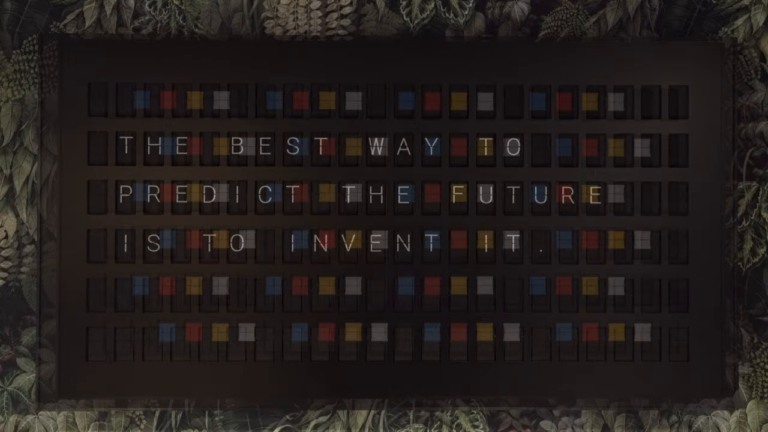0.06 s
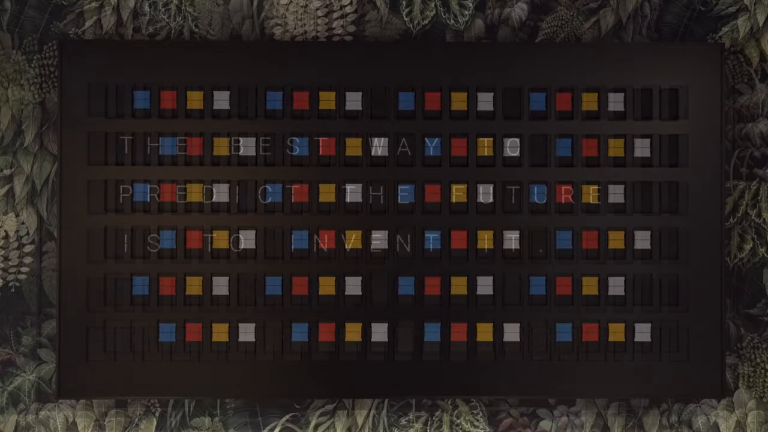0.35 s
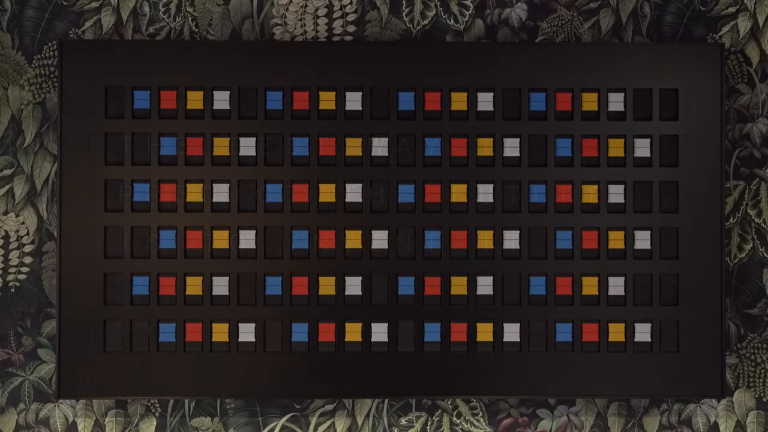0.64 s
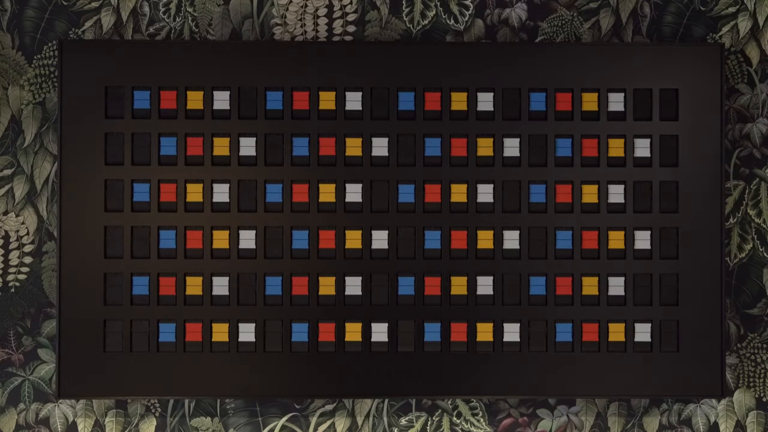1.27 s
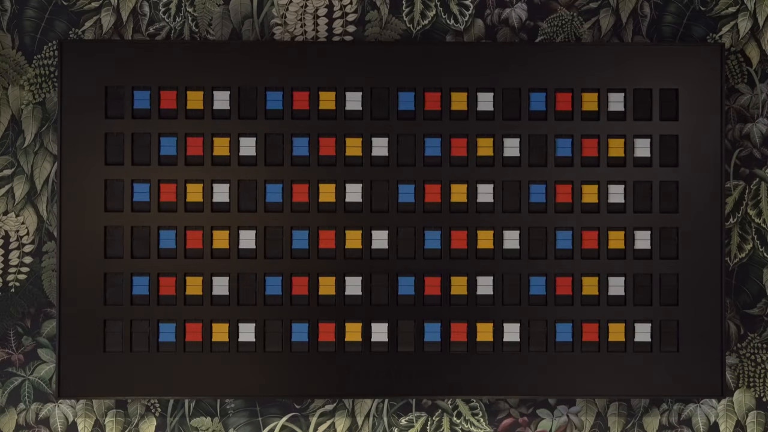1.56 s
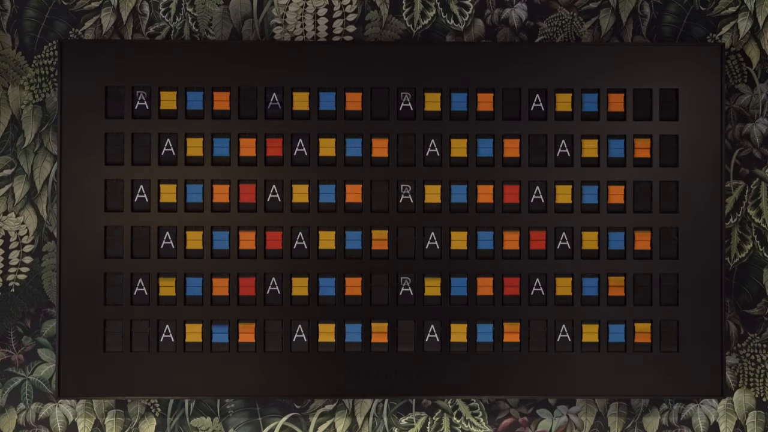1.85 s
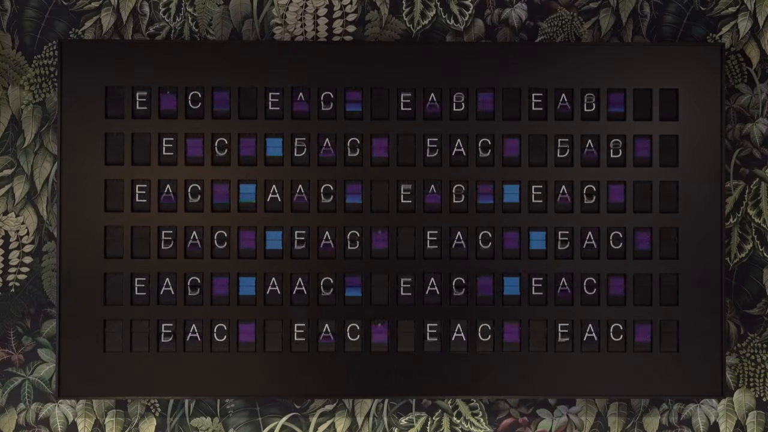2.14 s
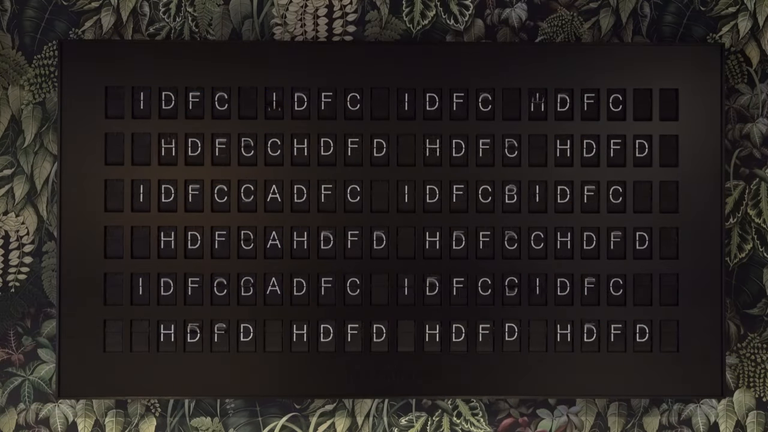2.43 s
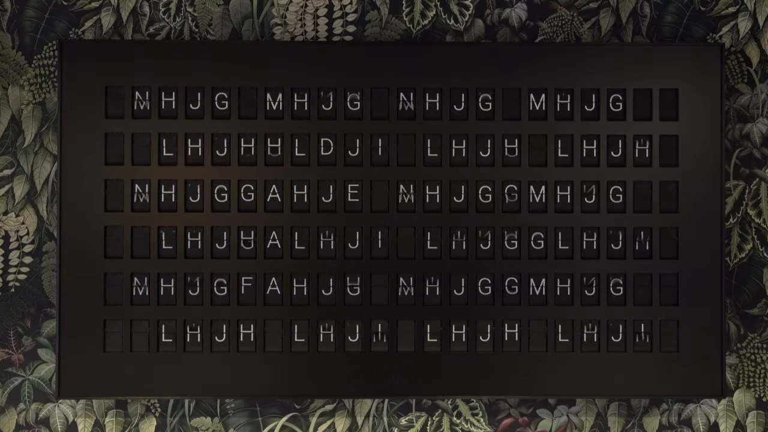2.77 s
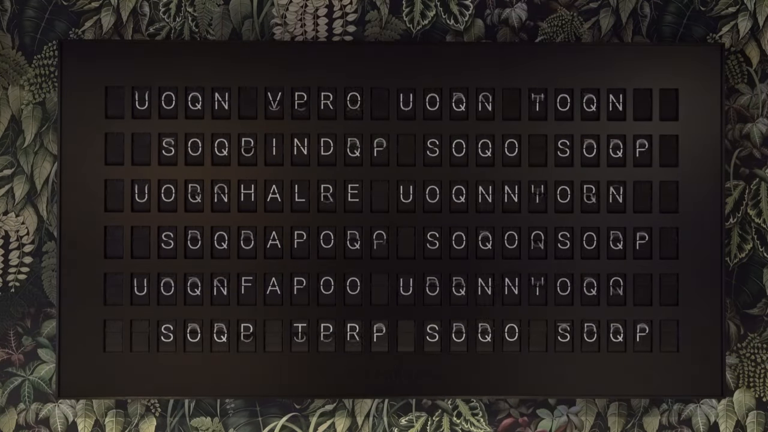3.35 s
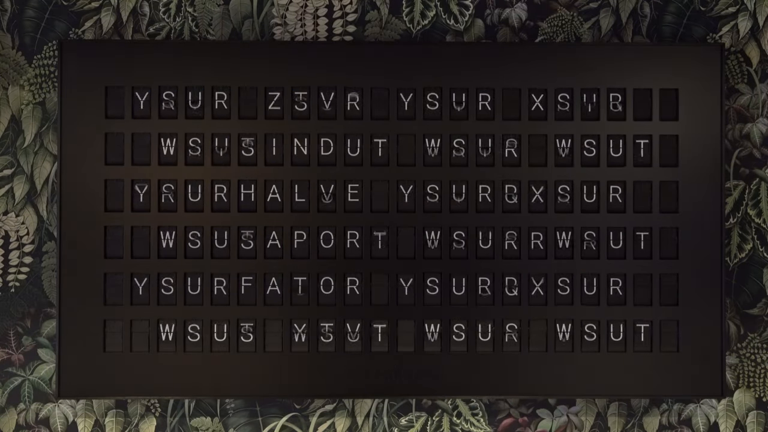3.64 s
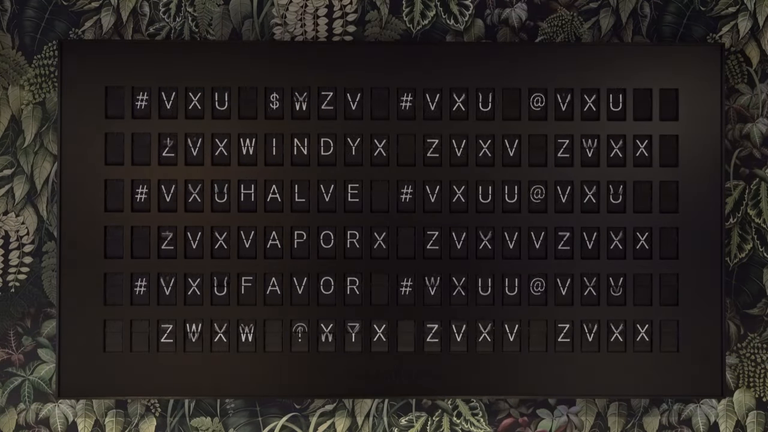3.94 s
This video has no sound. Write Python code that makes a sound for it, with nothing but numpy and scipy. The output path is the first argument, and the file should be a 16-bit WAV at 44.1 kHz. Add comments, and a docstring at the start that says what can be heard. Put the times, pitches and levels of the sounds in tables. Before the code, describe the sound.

Dense mechanical rattle of a flip-tile board starting up in a quietly humming room

```python
"""A quiet room hums with ventilation, and a few faint wisps of tone pass in the first moments.
At 1.7 s the motors of a split-flap wall display begin to whirr and set its case rumbling.
About a hundred modules then flip twelve flaps a second each. Every flip is three impacts: a tick as
the flap slips off its catch, a slap as it lands and a knock in the case. The modules start in step,
so the clatter pulses at first; their speeds differ, and they drift apart into an even rattle."""
import sys
import numpy as np
from scipy import signal
from scipy.fft import rfft, irfft, next_fast_len
from scipy.io import wavfile
from scipy.ndimage import map_coordinates

SR = 44100
rng = np.random.default_rng(int(sys.argv[2]) if len(sys.argv) > 2 else 0)


def output_pcm(signal):
    """Save a mono or channel-first signal as 16-bit PCM at the path in sys.argv[1].

    Samples are clipped to [-1, 1] before scaling.
    """
    pcm = np.clip(np.atleast_2d(signal).T, -1, 1) * 32767
    wavfile.write(sys.argv[1], SR, np.round(pcm).astype(np.int16))


N = 176400


def amp(db):
    return 10 ** (np.asarray(db) / 20)


def unit_rms(x):
    return x / np.sqrt(np.mean(x ** 2) + 1e-20)


def gain_at(curve, hz):
    """Amplitude gain of a (Hz, dB) curve, interpolated on a log frequency axis."""
    knots_hz, db = np.transpose(curve)
    return amp(np.interp(np.log(hz + 1), np.log(knots_hz + 1), db))


def filtered(x, response):
    """Zero-phase filtering: the spectrum of x is multiplied by response(hz)."""
    n = x.shape[-1]
    padded = next_fast_len(n + 8192)
    return irfft(rfft(x, padded) * response(np.fft.rfftfreq(padded, 1 / SR)), padded)[..., :n]


def coloured(x, curve, size=4096):
    """Minimum-phase filtering: folding the cepstrum makes the response causal."""
    cepstrum = irfft(np.log(gain_at(curve, np.fft.rfftfreq(size, 1 / SR))))
    cepstrum[1:size // 2] *= 2
    cepstrum[size // 2 + 1:] = 0
    impulse_response = irfft(np.exp(rfft(cepstrum)))
    return signal.fftconvolve(x, impulse_response[None], axes=1)[:, :N]


def wobble(rate):
    """A smooth random curve with rate knots a second."""
    return map_coordinates(rng.standard_normal(int(N * rate / SR) + 4), [np.arange(N) * rate / SR])


def bell(count):
    """Stratified sampling: count values that fill a unit normal distribution, shuffled."""
    return rng.permutation(np.quantile(rng.standard_normal(count ** 2), (np.arange(count) + .5) / count))


# Width of diffuse sound. Each row: frequency in Hz, side level over mid in dB.
DIFFUSE_WIDTH = [(35, -42), (90, -25), (180, -24), (350, -19.5), (700, -9.6), (1400, -4.2), (2800, -.3),
                 (6000, .3), (12000, -2.2)]

def diffuse(pair):
    """Diffuse field: two unrelated signals become stereo, nearly mono at long wavelengths."""
    def mid_side_gains(hz):
        width = gain_at(DIFFUSE_WIDTH, hz)
        return np.array([np.ones_like(hz), width]) / np.hypot(1, width)

    mid, side = filtered(pair, mid_side_gains)
    return np.array([mid + side, mid - side])


def diffuse_noise(response):
    """Diffuse noise of unit RMS, shaped by response(hz)."""
    return unit_rms(filtered(diffuse(rng.standard_normal((2, N))), response))


# Air noise. Each row: frequency in Hz, relative spectral density in dB.
AIR_SPECTRUM = [(15, -1), (35, -12), (48, 2.5), (70, 0), (125, -3), (210, -2), (290, -7.5), (700, -14),
                (1400, -18.5), (2800, -21.5), (6000, -24), (15500, -28.5)]
# Ventilation hum. Each row: frequency in Hz, level in dB.
HUM_TONES = [(119, -67), (157, -67.5), (205, -69)]

def ventilation(air_db=-56):
    """Broadband air noise lies under hum tones that waver by amplitude and phase modulation."""
    t = np.arange(N) / SR
    air = diffuse_noise(lambda hz: gain_at(AIR_SPECTRUM, hz))
    hum = np.zeros(N)
    for hz, db in HUM_TONES:
        tone = amp(1.2 * wobble(6)) * np.sin(2 * np.pi * hz * t + 0.74 * wobble(7))
        hum += amp(db) * unit_rms(tone)
    return amp(air_db) * air + hum


# Wisps of tone. Each row: centre and half-width in Hz, level in dB, start and end in seconds.
WISPS = [(1150, 73, -64, 0.06, .105), (1150, 60, -67.5, 0.16, 0.25), (1190, 50, -66, 0.3, 0.294),
         (2450, 97, -71, 0.11, .29)]

def faint_wisps(fade_s=.02):
    """Narrow-band noise is heard as a fuzzy pitch, here barely above the room noise."""
    t, out = np.arange(N) / SR, np.zeros((2, N))
    for centre, width, db, start, end in WISPS:
        band = diffuse_noise(lambda hz: 1 / (1 + ((hz - centre) / width) ** 2))
        envelope = np.exp(-abs(t - np.clip(t, start, end)) / fade_s)
        out += amp(db + 2.1 * wobble(26.4)) * band * envelope
    return out


# Gear whirr and case rumble. Each row: frequency in Hz, relative spectral density in dB.
WHIRR_SPECTRUM = [(200, -13.5), (400, 8), (900, 3.5), (2000, 2), (4200, -6), (5000, 6), (9000, -9),
                  (15500, -23)]
RUMBLE_SPECTRUM = [(30, -26), (50, -30), (65, -4), (110, -0.5), (160, 3.5), (260, -47), (1000, -70)]
# Course of the rumble. Each row: time in seconds, level in dB.
RUMBLE_COURSE = [(1.7, -77), (1.8, -59), (2.05, -58.5), (2.3, -51), (2.6, -55.5), (3.0, -54), (3.5, -54),
                 (3.9, -50.5)]

def motors(start_s=1.701, rise_s=.014, whirr_db=-39):
    """Forced vibration: the gears of all the motors whirr, and slowly set the case rumbling."""
    t = np.arange(N) / SR
    whirr = diffuse_noise(lambda hz: gain_at(WHIRR_SPECTRUM, hz))
    rumble = unit_rms(filtered(rng.standard_normal(N), lambda hz: gain_at(RUMBLE_SPECTRUM, hz)))
    rumble_db = np.interp(t, *np.transpose(RUMBLE_COURSE))
    running = np.clip((t - start_s) / rise_s, 0, 1) ** 2
    return running * (amp(whirr_db) * whirr + amp(rumble_db) * rumble)


def room(x, count=4, wet_db=1, bass_t60_s=.33, treble_t60_s=.2):
    """Reverberation, dying faster in the treble; count tails take turns, switching every 1024 samples."""
    hz, t, noise = signal.stft(rng.standard_normal((count, 2, SR // 3)), SR, nperseg=256)
    t60 = np.interp(hz, [0, 10000], [bass_t60_s, treble_t60_s])
    tails = signal.istft(noise * amp(-60 * t / t60[:, None]), SR, nperseg=256)[1]
    tails /= np.linalg.norm(tails, axis=-1, keepdims=True)
    turn = np.arange(N) // 1024 % count
    wet = sum(signal.fftconvolve((x.mean(0) * (turn == k))[None], tails[k], axes=1)[:, :N]
              for k in range(count))
    return x + amp(wet_db) * diffuse(wet)


def module_clicks(places, t60_s, size=1024, edge_delay_s=.00004, edge_pan_db=1):
    """Each module has its own damped ring, located by left-right differences of time and level."""
    rings = rng.standard_normal((len(places), size)) * amp(-60 * np.arange(size) / SR / t60_s)
    side = places[:, None, None] * np.array([[.5], [-.5]])
    delay_cycles = edge_delay_s * (1 + side) * np.fft.rfftfreq(size, 1 / SR)
    return irfft(rfft(rings)[:, None] * np.exp(-2j * np.pi * delay_cycles)) * amp(-edge_pan_db * side)


# Strength of the impacts. Each row: time in seconds, relative level in dB.
IMPACT_STRENGTH = [(1.72, -4), (1.765, -0.8), (1.795, -1), (1.845, -1), (1.88, -2), (1.925, 0.1),
                   (1.96, -1.5), (2.04, 0), (2.088, 1), (2.115, 0.5), (2.17, 0.2), (2.3, -1.2), (2.6, -0.5),
                   (3.15, -0.1), (3.245, 0.8), (3.3, -0.24), (3.6, 0.3), (4.0, 0.46)]

def impacts(times, clicks, touches, flight_s=.024, bounce_db=-5.5):
    """Inelastic collision: each impact sounds its module's click, then bounces more weakly."""
    module_db = 2 * rng.uniform(-0.79, 1, (len(times), 1))
    flip_db = 2.4 * np.clip(rng.standard_normal(times.shape), -2, 2)
    gains = amp(module_db + flip_db + np.interp(times, *np.transpose(IMPACT_STRENGTH)))
    times = np.hstack([times + k * flight_s * (.5 + rng.random(times.shape)) for k in range(touches)])
    gains = np.hstack([gains * amp(k * bounce_db) for k in range(touches)])
    size = clicks.shape[-1]
    out = np.zeros((2, N + size))
    for click, onsets, strengths in zip(clicks, np.round(times * SR).astype(int), gains):
        for onset, gain in zip(onsets[onsets < N], strengths[onsets < N]):
            out[:, onset:onset + size] += gain * click
    return out[:, :N]


FIRST_RELEASE_S = 1.735  # mean over the modules

def clatter(times, places, spectrum, t60_s, db, touches, jitter_s=.0035):
    """Source and filter: one kind of impact from all modules, reverberated, coloured and set to db."""
    times = times + jitter_s * rng.standard_normal(times.shape)
    direct = impacts(times, module_clicks(places, t60_s), touches)
    sound = coloured(room(direct), spectrum)
    return amp(db) * sound / sound[:, int(FIRST_RELEASE_S * SR):].std()


def release_times(modules, flips, period_s=.082, speed_spread=.0065, settle_flips=4):
    """Dephasing: uneven run-up and slightly unequal periods draw the modules out of step."""
    starts = FIRST_RELEASE_S + .008 * bell(modules)
    periods = period_s * (1 + speed_spread * bell(modules))
    flip = np.arange(flips)
    run_up_lag = .0145 * bell(modules)[:, None] * (1 - np.exp(-flip / settle_flips))
    return starts[:, None] + periods[:, None] * flip + run_up_lag


# Colours of the three impacts. Each row: frequency in Hz, relative spectral density in dB.
TICK_SPECTRUM = [(500, -25), (2000, -1), (5100, 1.5), (6500, -2), (9000, -6), (11000, -9), (12800, -5),
                 (15800, -15)]
SLAP_SPECTRUM = [(250, -22), (600, -10), (780, -6), (920, 1), (1030, -1), (1150, -0.5), (1700, -1),
                 (2200, 3), (2650, -.5), (4100, 0), (4700, -7.5), (7000, -6), (11000, -7), (16000, -33)]
KNOCK_SPECTRUM = [(60, -51), (120, -26), (185, -16), (230, -6.5), (270, -14), (305, -8.5), (350, -1),
                  (460, -1), (515, -5.5), (610, -2), (730, -5), (870, -2.5), (980, -0.5), (1200, -10.5),
                  (2500, -18.5), (8000, -26)]
# Balance of the clatter. Each row: frequency in Hz, left level minus right in dB.
STEREO_BALANCE = [(200, 0), (400, .4), (700, .2), (1300, -.3), (2500, -.7), (5000, -.6), (8500, -3.5),
                  (12000, -.7)]

def flaps(modules=104, flips=30, fall_s=.022, knock_lag_s=.029):
    """Impact excitation: each flap ticks off its catch, slaps down and knocks in the case."""
    releases = release_times(modules, flips)
    places = rng.permutation(np.linspace(-1, 1, modules))  # left to right along the wall
    tick = clatter(releases, places, TICK_SPECTRUM, t60_s=.01, db=-28.5, touches=3)
    slap = clatter(releases + fall_s, places, SLAP_SPECTRUM, t60_s=.012, db=-27.8, touches=3)
    knock = clatter(releases + knock_lag_s, places, KNOCK_SPECTRUM, t60_s=.02, db=-32, touches=2)
    channel_share = np.array([[.5], [-.5]])
    return filtered(tick + slap + knock, lambda hz: gain_at(STEREO_BALANCE, hz) ** channel_share)


def scene():
    """Superposition: the sounds of the display add to those of the room."""
    return flaps() + motors() + ventilation() + faint_wisps()


def record(dry):
    """Band limiting: an ideal low-pass filter passes nothing above 15.8 kHz."""
    return filtered(dry, lambda hz: hz < 15800)


dry = scene()
out = record(dry)
output_pcm(out)
```